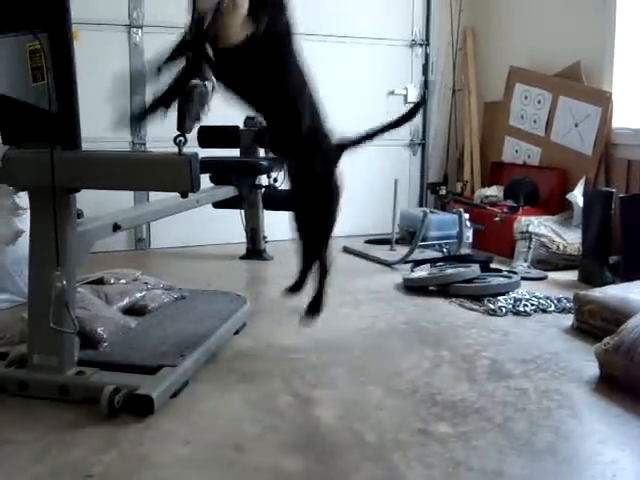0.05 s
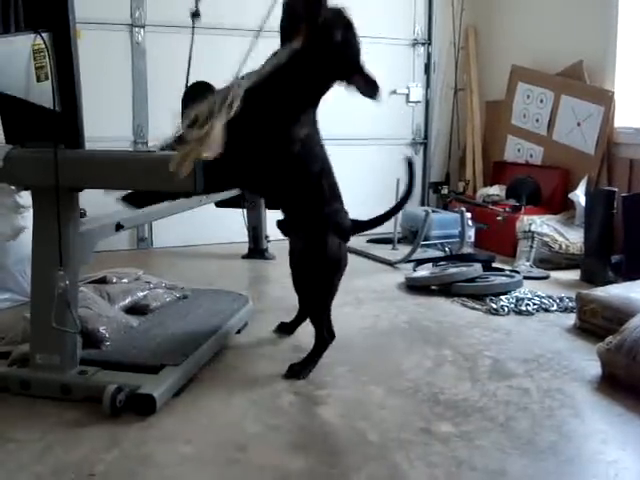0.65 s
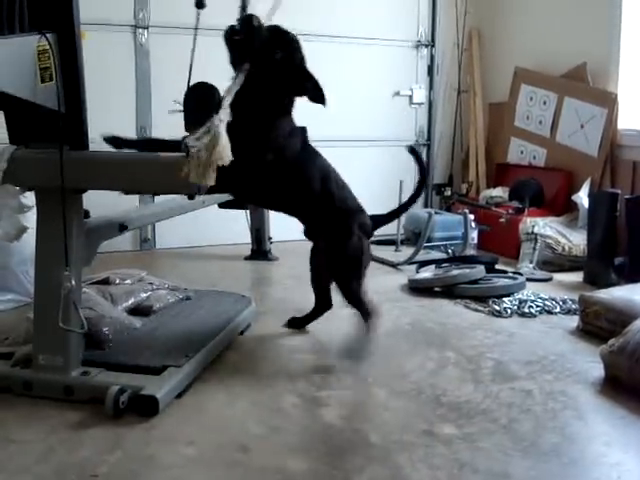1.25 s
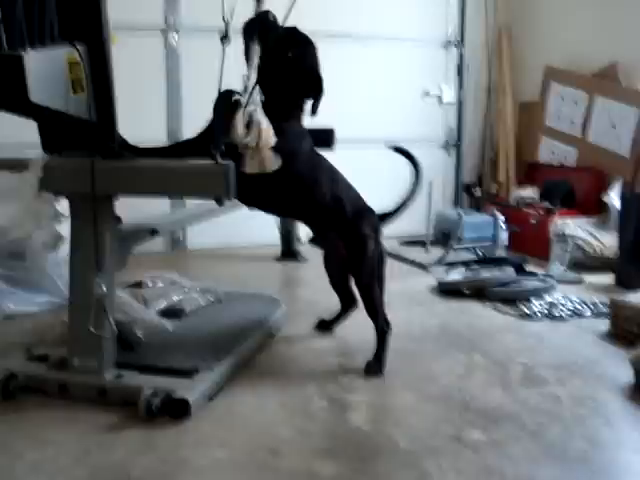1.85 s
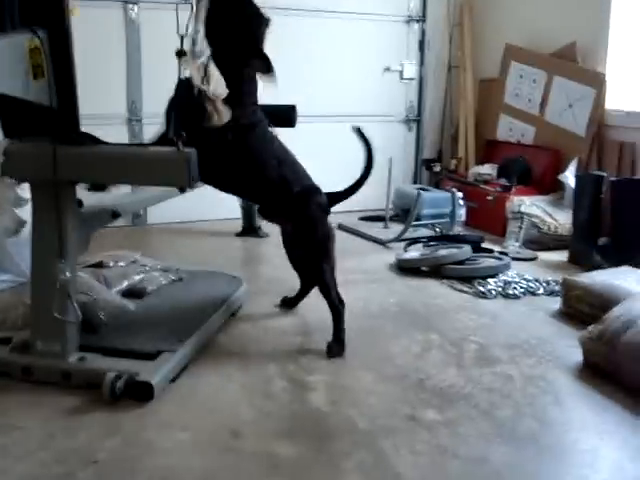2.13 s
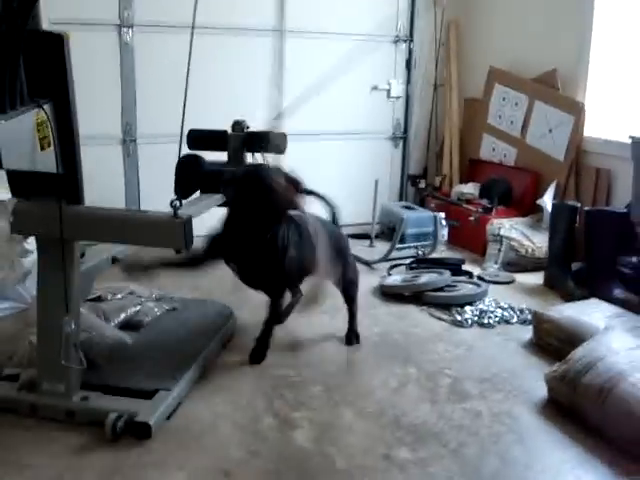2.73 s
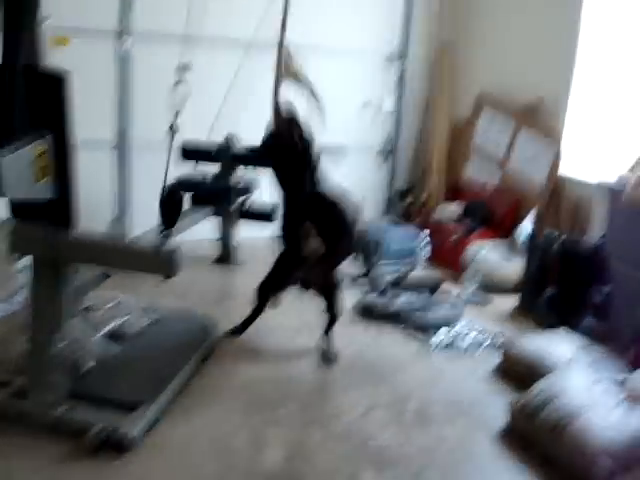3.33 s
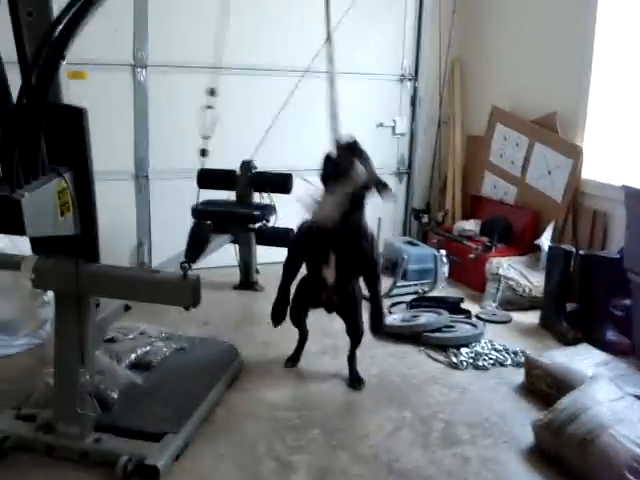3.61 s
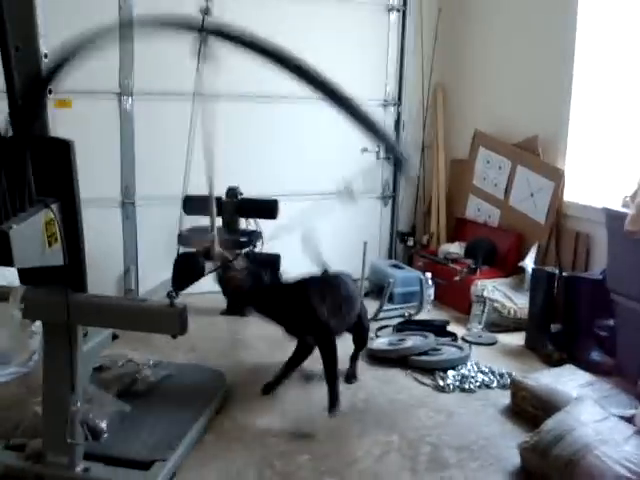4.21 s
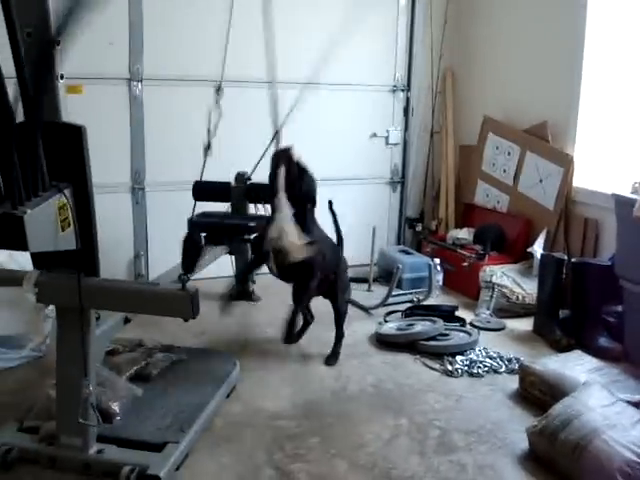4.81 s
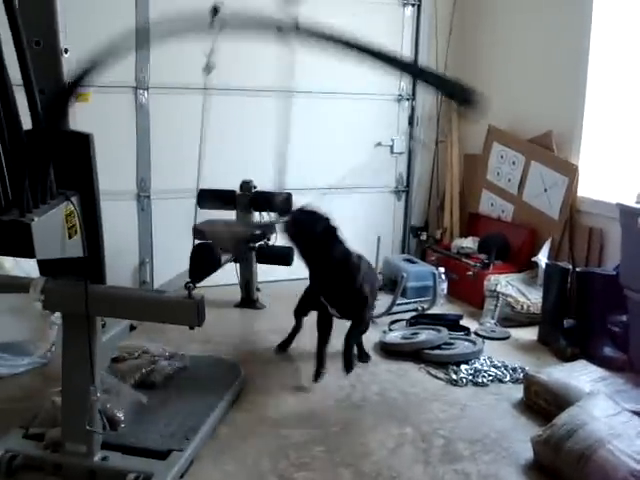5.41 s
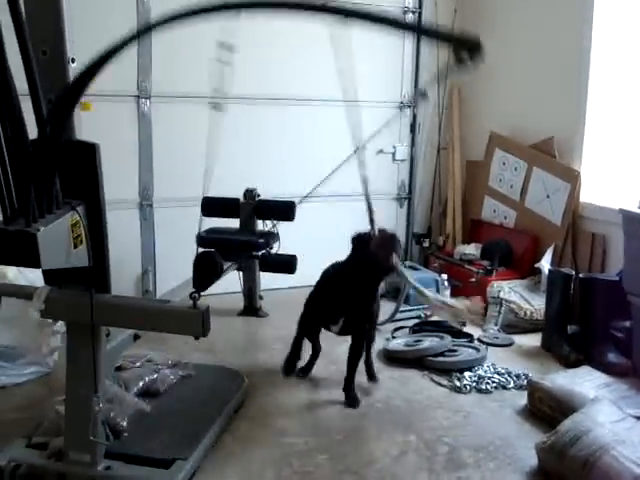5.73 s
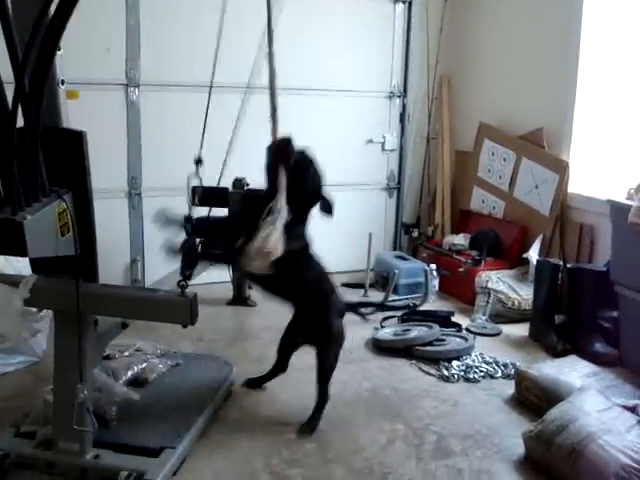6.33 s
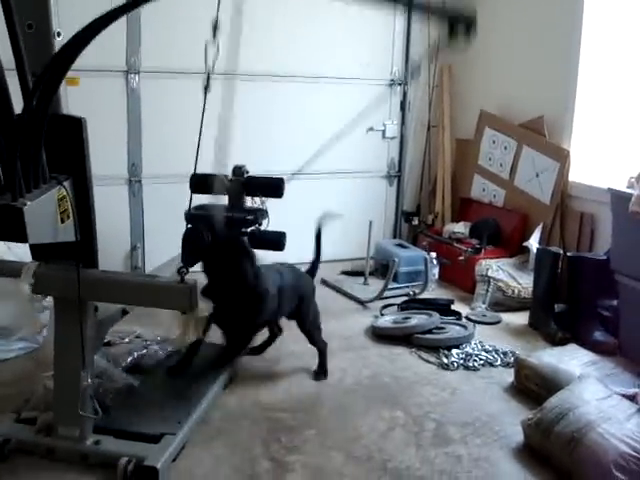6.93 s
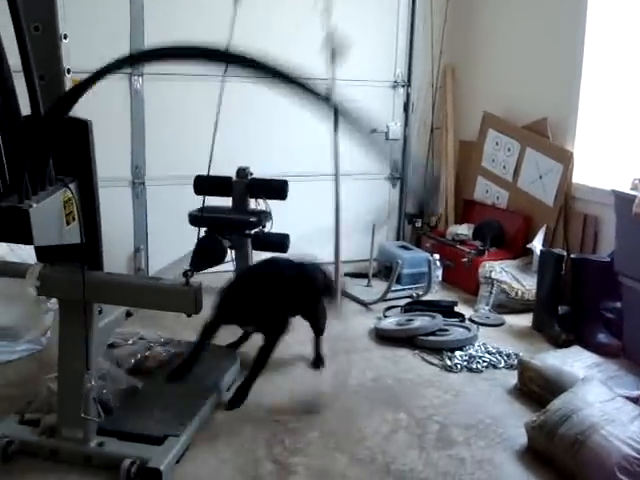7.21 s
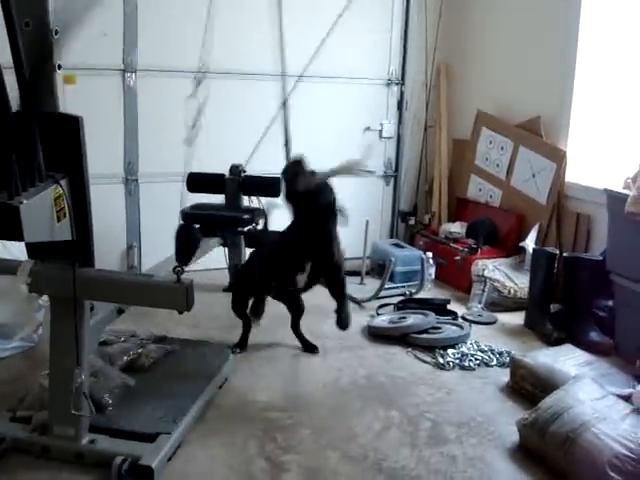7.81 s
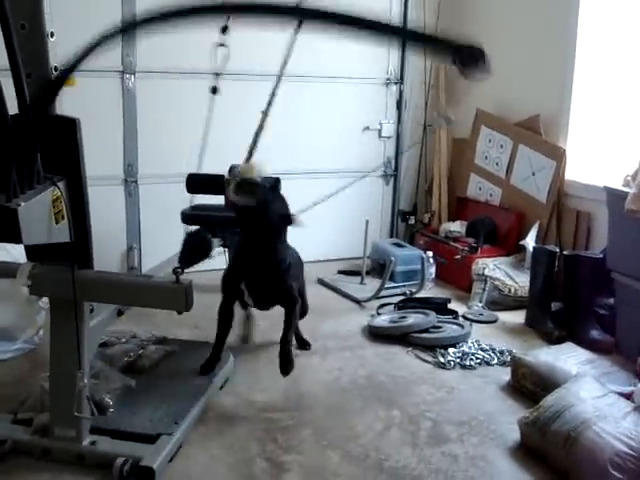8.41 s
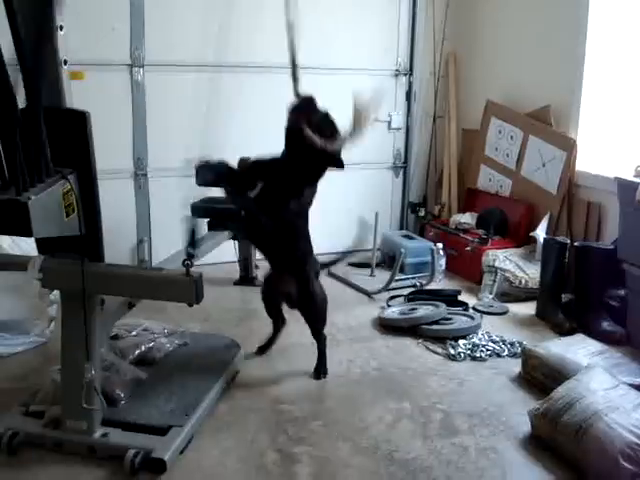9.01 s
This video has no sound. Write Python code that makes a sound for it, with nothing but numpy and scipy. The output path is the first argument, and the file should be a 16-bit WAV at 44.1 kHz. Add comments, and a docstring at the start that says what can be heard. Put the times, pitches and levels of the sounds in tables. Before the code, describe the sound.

A gym machine clanks and rattles in a garage as a dog tugs its cable, with jingling hooks and faint grunts.

```python
"""A home gym slams and rattles in a concrete garage as a dog thrashes at a rope tied to its cable.
Each tug takes up the slack with a light knock, then slams the frame. The cable whips steel snap hooks
against the machine, its stop ball clonks on a pulley and the rods swing back, over a bed of clattering
loose parts. The dog lands on its paws and grunts, a loose pulley chatters, and the bare room blurs it all.
"""
import sys
import numpy as np
from scipy import signal
from scipy.fft import rfft, irfft
from scipy.io import wavfile
from scipy.ndimage import uniform_filter1d

SR = 44100
rng = np.random.default_rng(int(sys.argv[2]) if len(sys.argv) > 2 else 0)


def to_wav(sig):
    """Store sig (one row per channel, or 1-D mono) as 16-bit WAV at the path in sys.argv[1].

    Samples outside -1..1 are clipped; the rate is SR.
    """
    pcm = np.clip(np.atleast_2d(sig), -1, 1) * 32767
    pcm = np.round(pcm).astype(np.int16)
    wavfile.write(sys.argv[1], SR, pcm.T)  # frames by channels


N = 403515
SIZE = 32768  # samples in one hit with its tail
T, HZ = np.arange(SIZE) / SR, np.fft.rfftfreq(SIZE, 1 / SR)

# fader ride of the loose parts: (time [s], level [dB])
CLATTER_RIDE = [(0, -40), (.18, -47.5), (.48, -32), (.9, -55), (1.12, -36), (1.7, -44), (2.55, -32),
                (2.9, -33.5), (3.7, -28), (4.17, -46), (4.5, -28.5), (5.05, -26.5), (5.3, -41.5),
                (5.78, -25.5), (6.1, -38.5), (6.55, -25), (6.85, -36.5), (7.9, -26), (9.15, -29)]
# rods swinging back: (time [s], level [dB], rattle length [s], pitch [Hz])
ROD_CLACKS = [(0.165, -37, 0.091, 1012), (.4, -7.5, 0.066, 1070), (1.202, -36, 0.042, 1230),
              (1.511, -11, 0.057, 950), (1.901, -14, 0.035, 980), (2.2, -7.5, 0.056, 1010),
              (2.23, -14, 0.017, 1090), (2.405, -15, 0.019, 1040), (2.573, -15, 0.012, 1430),
              (3.265, -8, 0.039, 1030), (3.622, -10, 0.1, 1220), (3.882, -13.5, 0.084, 900),
              (4.294, -12, 0.028, 1140), (4.65, -11, 0.15, 1480), (4.87, -14.5, 0.071, 1040),
              (5.151, -9, 0.033, 1390), (5.388, -15.5, 0.07, 1220), (5.628, -5.5, 0.075, 1080),
              (5.886, -11.5, 0.047, 1090), (6.248, -17.5, 0.034, 1110), (6.467, -8.5, 0.13, 1210),
              (7.727, -7.5, 0.082, 905), (8.24, -14.5, 0.22, 990), (8.371, -17.5, 0.026, 856),
              (8.429, -16.5, 0.084, 1430), (8.695, -9, 0.033, 1380), (8.986, -12, 0.017, 810)]
# frame slams: (time [s], slack lead [s], level [dB], hardness [dB], rattle length [s], pitch [Hz])
FRAME_SLAMS = [(.308, .074, -7, -5.5, 0.071, 890), (.566, 0.06, -3.5, .5, 0.066, 1540),
               (.78, 0.031, -13, 6, 0.03, 900), (1.802, 0.057, -9.5, -8.5, .055, 1026),
               (2.083, 0.05, -13.5, 0, 0.025, 1020), (2.679, .045, -5, -1, .08, 1110),
               (3.03, 0.051, -4.5, -6, 0.075, 623), (3.54, 0.07, -3, -3, 0.11, 980),
               (4.338, 0.079, -4.5, -4, 0.094, 1140), (5.535, 0.053, -11.5, -3, 0.028, 1126),
               (6.41, 0.092, -14, -8.5, 0.022, 1090), (7.063, 0.024, -11.5, -3.5, 0.36, 750),
               (7.5, .058, -8, -5, .14, 1380), (8.538, 0.05, -6.5, -8, 0.038, 1270)]
# stop ball hitting its pulley: (time [s], pitch [Hz], level [dB])
BALL_CLONKS = [(.235, 830, -24.5), (1.805, 1035, -14.5), (4.367, 1095, -14), (5.538, 1220, -20),
               (6.246, 1150, -15), (6.267, 830, -18), (6.271, 1220, -17), (8.54, 984, -11.5),
               (8.562, 730, -25)]
# hooks hitting the machine: (time [s], knock level [dB], jingle level [dB], rattle length [s])
HOOK_WHIPS = [(.278, -7, -45, 0.089), (1.335, -25, -42.5, 0.099), (1.399, -13, -34.5, 0.036),
              (2.981, -13, -26.5, 0.065), (3.159, -8, -21.5, 0.12), (3.747, -8.5, -27.5, 0.1),
              (4.468, -9, -27.5, 0.077), (4.539, -11.5, -26.5, .13), (4.826, -9, -25, 0.15),
              (5.648, -12, -23, 0.1), (6.8, -19.5, -31.5, 0.21), (7.442, -11.5, -25.5, 0.076),
              (7.638, -8.5, -24.5, .12), (7.917, -14, -22.5, 0.097), (8.629, -11.5, -29, 0.036),
              (8.842, -7.5, -31.5, 0.075), (9.135, -16, -25, 0.033)]
# paws landing on floor and treadmill deck: (time [s], level [dB])
PAW_LANDINGS = [(0.298, -30), (1.799, -41), (2.76, -28.5), (2.991, -27), (3.099, -28), (7.059, -25),
                (7.159, -29.5)]
# pulley chatters and squeaks: (time [s], length [s], pitch [Hz], level [dB])
PULLEY_CHATTERS = [(2.569, 0.066, 1420, -44), (3.18, 0.085, 5650, -42), (3.4, 0.63, 3780, -44),
                   (3.901, 0.19, 1426, -36.5), (4.5, .75, 3820, -42.5), (5.134, 0.073, 1390, -32),
                   (5.681, 0.14, 1410, -25), (6.08, .15, 1160, -41), (6.656, 0.082, 1466, -26),
                   (6.931, 0.31, 1316, -37.5), (7.501, 0.07, 1435, -24), (7.65, 0.17, 3810, -34),
                   (8.082, 0.1, 1405, -33), (8.42, 0.071, 1470, -27.5)]
# the dog's grunts: (time [s], length [s], pitch [Hz], level [dB])
DOG_GRUNTS = [(2.754, 0.052, 223, -39), (2.979, 0.071, 219, -34), (4.538, 0.034, 219, -38),
              (5.107, 0.049, 208.4, -29.5), (5.35, 0.044, 199.4, -29.5), (5.693, 0.03, 214, -36),
              (6.774, 0.073, 217.3, -44.5), (7.059, 0.054, 207.3, -33.5), (7.716, 0.039, 211.7, -26.5),
              (8.208, 0.04, 213, -34), (8.65, 0.065, 225.6, -37), (9.003, 0.014, 236, -32)]
# tone of the room's hush, the struck parts, the paws and the dog's throat: (frequency [Hz], gain [dB])
HUSH_EQ = [(25, -43), (70, -20.5), (140, -16), (440, -1.5), (800, 0), (1400, -6.5), (2200, -2), (5800, -19),
           (10000, -18.5)]
FRAME_EQ = [(40, -35), (130, -40.5), (210, -24.5), (400, -4), (580, 2.5), (820, 3), (1100, -14.5),
            (1530, -14), (3000, -31), (5700, -27), (9500, -48)]
RODS_EQ = [(60, -54), (210, -29), (380, -17), (580, -13), (820, -2.5), (1100, 0), (1530, -1.5), (2160, -6),
           (3000, -10), (5700, -17), (7300, -56), (9500, -54)]
FITTINGS_EQ = [(60, -59), (210, -28), (580, -17.5), (820, -15.5), (1530, -18.5), (2160, 5), (3100, -1),
               (5900, 2), (7300, -3.5), (9800, -10)]
HOOKS_EQ = [(200, -52), (820, -28), (1530, 1), (3000, -8.5), (4240, 1.5), (5700, 4.5), (7300, 4.5),
            (8500, 5), (9900, -0.5)]
PAWS_EQ = [(25, -35), (60, -23), (100, -13), (170, -6), (230, 2), (320, -1.5), (700, -17), (3000, -37)]
THROAT_EQ = [(110, -30), (200, -9.5), (410, 2.5), (600, -6.5), (800, 3), (1100, -10), (2000, -22),
             (5000, -19)]
# resonances of machine and hooks, standing waves of the room: (frequency [Hz], width [Hz], boost [dB])
MACHINE_PEAKS = [(590, 40, 2), (813, 22, 3.5), (1002, 25, 4), (1821, 25, 4), (2184, 30, 5.5), (2961, 45, 4),
                 (3800, 110, 3), (4472, 30, 3), (5255, 45, 3)]
HOOK_PEAKS = [(3790, 40, 5), (4235, 50, 7), (4472, 30, 5), (5690, 80, 6), (6600, 70, 4), (7978, 45, 6),
              (8318, 45, 5), (8733, 35, 6)]
ROOM_PEAKS = [(228.4, 18, 6), (459, 41, 3.5)]
# reverb tail of the garage: (frequency [Hz], time to fall 60 dB [s])
GARAGE_DECAY = [(150, 0.77), (500, .64), (1400, 0.59), (3700, 0.64), (6500, 0.55), (10000, 0.62)]


def amp(db):
    """Decibels to gain."""
    return 10 ** (np.asarray(db) / 20)


def unit_rms(x):
    """Scales to rms 1."""
    return x / np.sqrt(np.mean(x ** 2) + 1e-20)


def curve(points, hz=HZ):
    """Joins (frequency, value) points on a log-frequency axis."""
    freqs, values = np.transpose(points)
    return np.interp(np.log(hz + 1), np.log(freqs), values)


def add(mix, time, sound):
    """Mixes a sound in at a time in seconds."""
    part = mix[max(round(time * SR), 0):][:len(sound)]
    part += sound[:len(part)]


def peaks(modes):
    """Gain of resonances standing out of a flat response."""
    bells = sum((amp(db) ** 2 - 1) / (1 + (2 * (HZ - hz) / width) ** 2) for hz, width, db in modes)
    return np.sqrt(1 + bells)


def resonance(hz, width):
    """Gain of one resonance with steep skirts."""
    return (1 + (2 * (HZ - hz) / width) ** 2) ** -2.


def colour(x, gain):
    """Minimum-phase EQ: resonances ring after the hit."""
    cepstrum = irfft(np.log(np.maximum(gain, 1e-5)))
    cepstrum[1:SIZE // 2] *= 2
    return irfft(rfft(x, SIZE) * np.exp(rfft(cepstrum[:SIZE // 2], SIZE)))


def garage(x, early_db, early_s=0.0048, build_s=0.003):
    """Reverb from a new spot in the room: tight early reflections, then a tail dying band by band."""
    hz, t, bands = signal.stft(rng.standard_normal(SIZE), SR, nperseg=256)
    decay = np.exp(-np.log(1000) * t / curve(GARAGE_DECAY, hz)[:, None])
    tail = signal.istft(bands * decay, SR, nperseg=256)[1][:SIZE]
    early = amp(early_db) * np.exp(-T / (2 * early_s)) * rng.standard_normal(SIZE)
    build_up = np.sqrt(1 - np.exp(-T / build_s))
    return signal.fftconvolve(x, build_up * (early + tail))[:SIZE]


def placed(x, db, length, early_db):
    """Sets a sound in the room, with the energy of that level held for that length."""
    wet = garage(x, early_db, early_s=0.0022, build_s=0.00059)
    return amp(db) * wet * np.sqrt(length * SR) / np.linalg.norm(wet)


def rattle(length, per_s, even_split_s, spread_db):
    """A first contact, then uneven bounces that die away; energy 1."""
    sizes = amp(spread_db * rng.standard_normal(SIZE)) * rng.choice([-1, 1], SIZE)
    bounces = rng.random(SIZE) < per_s / SR
    clicks = sizes * bounces * np.sqrt(np.maximum(1 - T / length, 0))
    first_share = even_split_s / (even_split_s + length)  # long rattles soften the attack
    clicks *= np.sqrt(1 - first_share) / (np.linalg.norm(clicks) + 1e-9)
    clicks[0] = np.sqrt(first_share)
    return clicks[:SIZE // 4] / np.linalg.norm(clicks)


def machine_tone(hardness_db):
    """Gain of the ringing machine: soft hits favour the hollow frame, hard ones the bright fittings."""
    frame = amp(curve(FRAME_EQ) - 13 - 1.56 * hardness_db)
    rods = amp(curve(RODS_EQ))
    fittings = amp(curve(FITTINGS_EQ) - 11.5 + 0.81 * hardness_db)
    return np.sqrt(frame ** 2 + rods ** 2 + fittings ** 2) * peaks(MACHINE_PEAKS)


def knock(db, hardness_db, length, hz, ring_width_hz=70, max_ring_db=10, half_ring_s=0.13):
    """One hit rattles the machine; the shorter the rattle, the clearer the struck part's pitch."""
    ring = peaks([(hz, ring_width_hz, max_ring_db * half_ring_s / (half_ring_s + length))])
    clicks = rattle(length, per_s=220, even_split_s=0.02, spread_db=4.5)
    return amp(db) * colour(garage(clicks, early_db=4.5), machine_tone(hardness_db) * ring)


def room_tone(level_db=-46.5):
    """A faint, steady hush under everything."""
    tone = amp(curve(HUSH_EQ, np.fft.rfftfreq(N, 1 / SR)))
    return amp(level_db) * unit_rms(irfft(rfft(rng.standard_normal(N)) * tone, N))


def clatter(spots=5, per_s=110, spread_db=2, trim_db=-2):
    """Loose parts tap lightly and at random at several spots on the machine."""
    out = np.zeros(N)
    ride = amp(np.interp(np.arange(N) / SR, *np.transpose(CLATTER_RIDE)))
    for _ in range(spots):
        sizes = amp(spread_db * rng.standard_normal(N).clip(-2, 2))
        taps = sizes * (rng.random(N) < per_s / spots / SR)
        ring = colour(garage([1.], early_db=10), machine_tone(hardness_db=-1))
        out += signal.oaconvolve(unit_rms(taps) * ride, ring / np.linalg.norm(ring))[:N]
    return amp(trim_db) * out / np.sqrt(spots)


def rod_clacks(trim_db=-1):
    """The bent rods swing back and clack together."""
    out = np.zeros(N)
    for time, db, length, hz in ROD_CLACKS:
        add(out, time, knock(db, hardness_db=0, length=length, hz=hz))
    return amp(trim_db) * out


def frame_slams(slack_db=-6.5, slack_rattle_s=0.1, trim_db=-1):
    """Each tug is a double hit: a light knock as the slack goes, a slam as the cable stops."""
    out = np.zeros(N)
    for time, lead, db, hardness_db, length, hz in FRAME_SLAMS:
        add(out, time - lead, knock(db + slack_db, hardness_db, slack_rattle_s, hz))
        add(out, time, knock(db, hardness_db, length, hz))
    return amp(trim_db) * out


def stop_ball(contact_s=0.0046, trim_db=-1):
    """The cable's stop ball hits its pulley with a dull, tight clonk."""
    out = np.zeros(N)
    for time, hz, db in BALL_CLONKS:
        impact = rng.standard_normal(SIZE) * np.exp(-T / contact_s)
        clonk = colour(impact, resonance(hz, width=400))
        add(out, time, placed(clonk, db, length=0.011, early_db=10.5))
    return amp(trim_db) * out


def hook_knocks(trim_db=-1):
    """The cable whips the snap hooks into the machine: a hard, bright knock."""
    out = np.zeros(N)
    for time, db, _, length in HOOK_WHIPS:
        add(out, time, knock(db, hardness_db=5.5, length=length, hz=900))
    return amp(trim_db) * out


def hook_jingles(trim_db=-1):
    """The whipped steel hooks jingle; each shake wakes a fresh set of thin partials too."""
    out = np.zeros(N)
    steel = amp(curve(HOOKS_EQ)) * peaks(HOOK_PEAKS)
    for time, _, db, length in HOOK_WHIPS:
        partials = peaks([(hz, 50, 6) for hz in rng.uniform(3500, 9500, size=9)])
        clicks = rattle(length, per_s=200, even_split_s=0.012, spread_db=7)
        wet = garage(clicks, early_db=17, early_s=0.0024)
        add(out, time, amp(db) * colour(wet, steel * partials))
    return amp(trim_db) * out


def paw_thuds(trim_db=-1):
    """Paws land with soft, low thuds."""
    out = np.zeros(N)
    for time, db in PAW_LANDINGS:
        contacts = rattle(length=0.033, per_s=200, even_split_s=0.015, spread_db=2)
        add(out, time, amp(db) * colour(garage(contacts, early_db=18.5), amp(curve(PAWS_EQ))))
    return amp(trim_db) * out


def pulley_chatter(wobble_hz=55, wander=0.402):
    """The loose wheel wobbles on its axle, and each wobble sets it ringing briefly."""
    out = np.zeros(N)
    for time, length, hz, db in PULLEY_CHATTERS:
        count = round(length * SR)
        drift = unit_rms(uniform_filter1d(rng.standard_normal(SIZE), size=600))[:count]
        rate = wobble_hz * (1 + wander * drift)
        contact = abs(np.sin(np.pi * np.cumsum(rate) / SR)) ** 3
        ring = colour(contact * rng.standard_normal(SIZE)[:count], resonance(hz, width=220))
        add(out, time, placed(ring, db, length, early_db=14))
    return out


def dog_grunts(rise=0.15, jitter=0.042, breathiness=0.35):
    """Vocal folds and puffs of air sound through the throat: short, rough grunts that bend upward."""
    out = np.zeros(N)
    throat = amp(curve(THROAT_EQ))
    for time, length, hz, db in DOG_GRUNTS:
        count = round(length * SR)
        shake, air = rng.standard_normal((2, SIZE))
        tremor = unit_rms(uniform_filter1d(shake, size=150))[:count]
        pitch = hz * (1 + rise * np.linspace(-.5, .5, count) + jitter * tremor)
        cycles = np.cumsum(pitch) / SR
        swell = np.sin(np.linspace(0, np.pi, count))
        folds = sum(np.cos(2 * np.pi * k * cycles) for k in range(1, 14))
        puffs = air[:count] * np.cos(np.pi * cycles) ** 2  # air escapes once a cycle
        buzz = unit_rms(colour(folds * swell, throat))
        breath = unit_rms(colour(puffs * swell, throat))
        voice = (1 - breathiness) * buzz + breathiness * breath
        add(out, time, placed(voice, db, length, early_db=21))
    return out


def scene():
    """Machine and dog stir the room's standing waves over the room tone; mono on both channels."""
    machine = frame_slams() + hook_knocks() + rod_clacks() + clatter() + stop_ball() + hook_jingles()
    action = machine + paw_thuds() + pulley_chatter() + dog_grunts()
    standing_waves = colour([1.], peaks(ROOM_PEAKS))
    mono = signal.oaconvolve(action, standing_waves)[:N] + room_tone()
    return np.array([mono, mono])


def record(dry, cutoff_hz=10040):
    """Soft clipping rounds the hottest peaks, then a steep low-pass takes off the top."""
    low_pass = signal.firwin(511, cutoff_hz, window=("kaiser", 9), fs=SR)
    return signal.oaconvolve(np.tanh(dry), low_pass[None], "same")


dry = scene()
out = record(dry)
to_wav(out)
```